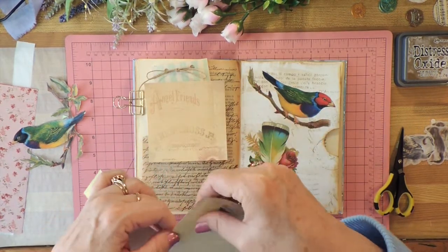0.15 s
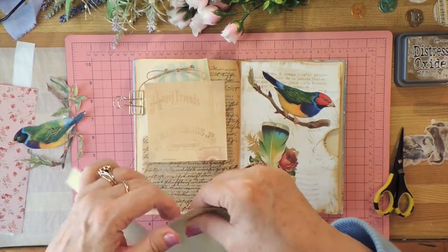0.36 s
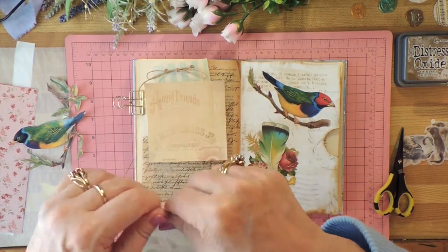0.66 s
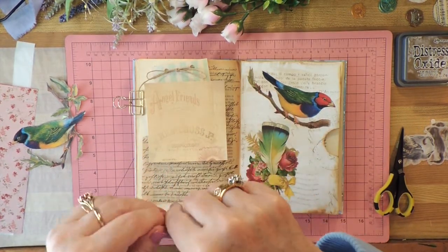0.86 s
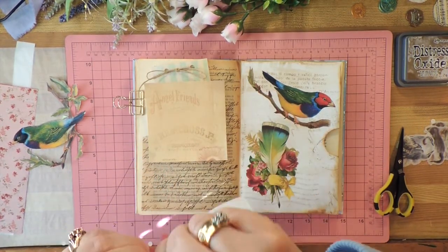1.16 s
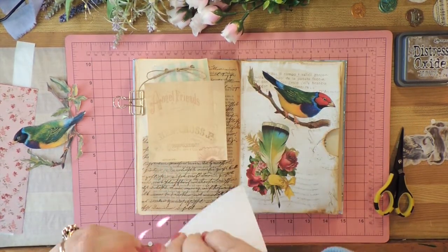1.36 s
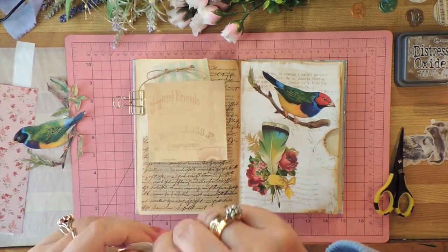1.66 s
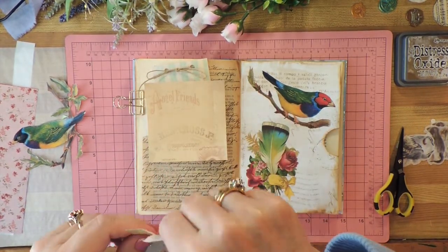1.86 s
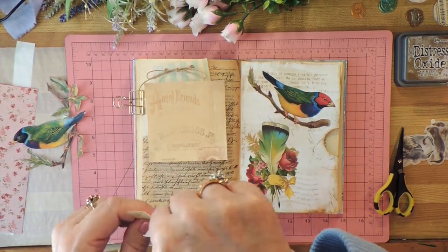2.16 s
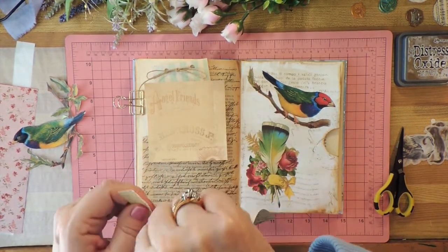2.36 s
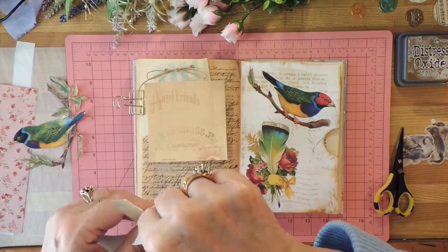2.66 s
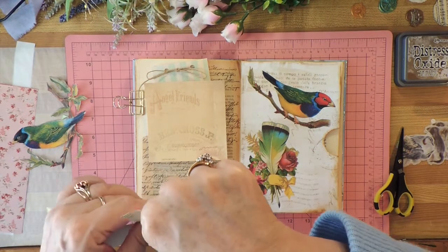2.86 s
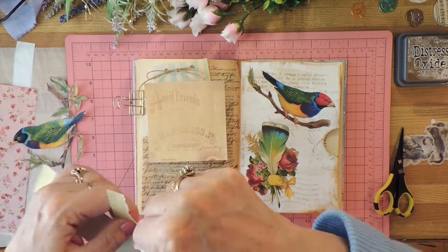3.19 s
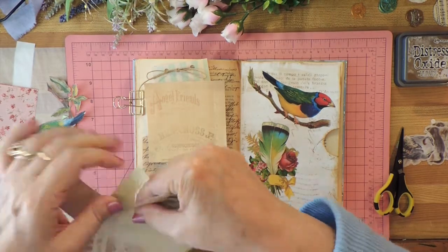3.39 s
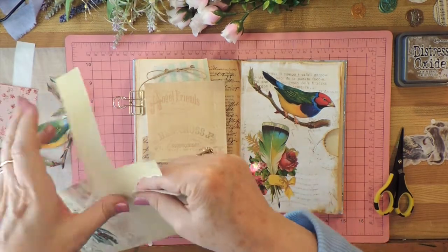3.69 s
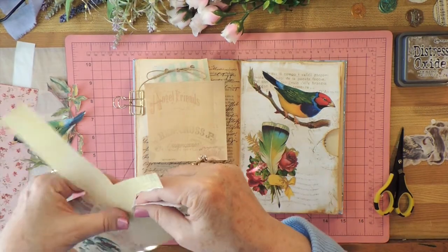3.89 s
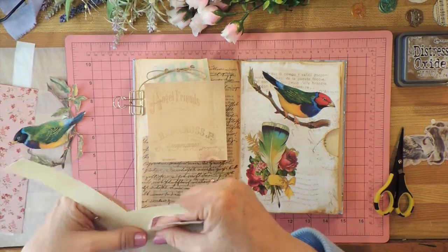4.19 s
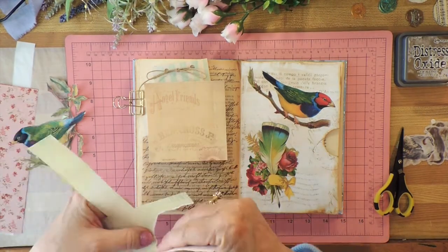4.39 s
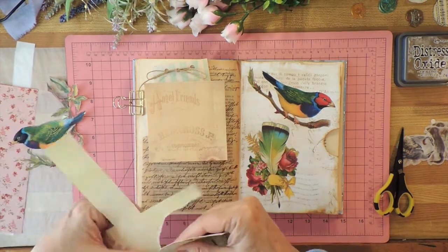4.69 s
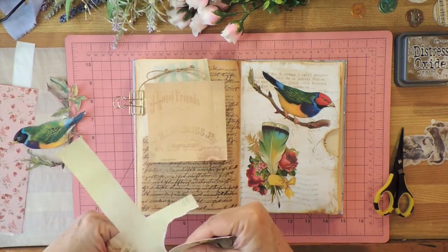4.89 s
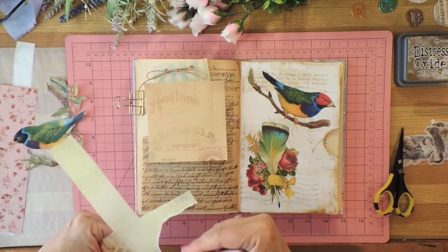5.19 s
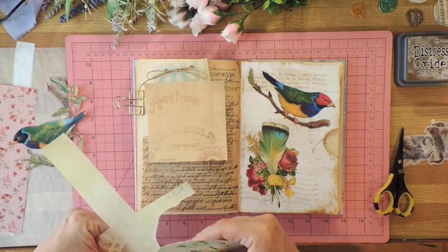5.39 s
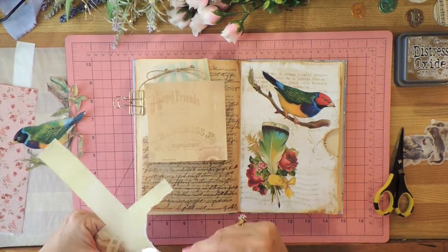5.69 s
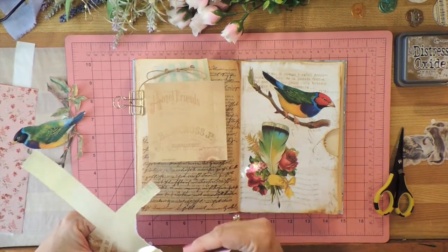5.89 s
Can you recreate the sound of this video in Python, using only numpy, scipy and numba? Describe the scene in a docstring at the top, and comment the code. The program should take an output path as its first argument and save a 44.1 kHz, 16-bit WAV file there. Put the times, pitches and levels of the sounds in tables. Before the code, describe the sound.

Dry, crisp paper handling close up, leaning slightly right. Faint skin-on-paper scuffs lead to a brief rip, then a stuttering cluster, a softer double tear, a hard snap of the sheet, and more sharp rips with pauses of rustling between. The last tear ends in a papery pop. Short indoor reverberation, very quiet air, and a barely audible soft clock tick once a second.

```python
"""Tearing a paper strip

A strip is torn from a sheet of paper in short rips, close to a stereo microphone in a small room.
Avalanches of fibre clicks crackle and excite the sheet; between rips, stick-slip clicks of sliding
fingers drive a held flap and damped bending modes sound as the paper buckles.
A clock ticks faintly once a second as a short sine pulse, over quiet coloured noise."""
import sys
import numpy as np
from scipy import signal
from scipy.fft import rfft, irfft
from scipy.io import wavfile
from numba import njit

SR = 44100
rng = np.random.default_rng(int(sys.argv[2]) if len(sys.argv) > 2 else 0)


def digitize_waveform(pressure):
    """Quantize a signal to 16-bit integers and store it at the path in sys.argv[1].

    Rows of a 2-D input are taken as channels; values are limited to [-1, 1].
    """
    field = np.atleast_2d(pressure).T
    bounded = np.clip(field, -1, 1)
    quanta = np.round(bounded * 32767).astype(np.int16)
    wavfile.write(sys.argv[1], SR, quanta)


N = 266760


def undb(db):
    """Logarithmic level: decibels to amplitude gain."""
    return 10 ** (np.asarray(db) / 20)


def unit(x):
    """Power normalisation: scale to rms 1."""
    return x / np.sqrt(np.mean(x ** 2))


def add(out, s, x):
    """Superposition: mix x into out from time s in seconds."""
    i = max(int(s * SR), 0)
    out[..., i:i + x.shape[-1]] += x[..., :max(N - i, 0)]


def spectrum(points, size):
    """Logarithmic frequency scale: read (Hz, dB) points at the bins of a transform."""
    hz, db = np.transpose(points)
    bins_hz = np.fft.rfftfreq(size, 1 / SR)
    return np.interp(np.log(bins_hz + 1), np.log(hz), db)


def colour(x, points):
    """Spectral shaping: weight x by the points, then scale to rms 1."""
    size = x.shape[-1]
    return unit(irfft(rfft(x) * undb(spectrum(points, size)), size))


def band(x, lo_hz, hi_hz, order=2):
    """Causal Butterworth band-pass filtering."""
    sos = signal.butter(order, [lo_hz, min(hi_hz, .45 * SR)], "band", fs=SR, output="sos")
    return signal.sosfilt(sos, x)


def ring(t60, channels=1, size=16384):
    """Dense modal decay: noise of energy 1 that falls 60 dB in t60 seconds."""
    h = rng.standard_normal((channels, size)) * np.exp(-np.log(1000) * np.arange(size) / SR / t60)
    return h / np.sqrt(np.sum(h ** 2, axis=1, keepdims=True))


def walk(rate):
    """Random modulation: interpolated noise of rms 1 with `rate` new values a second."""
    return unit(np.interp(np.arange(N) / SR * rate, np.arange(N), rng.standard_normal(N)))


def grains(rate, spread_db):
    """Shot noise: clicks at random moments, `rate` a second, with an exponential spread of level."""
    struck = rng.random(N) < rate / SR
    polarity = rng.choice([-1, 1], N)
    return struck * polarity * undb(spread_db * np.minimum(rng.exponential(size=N), 4))


def aim(clicks, scatter):
    """Directivity: every click reaches left and right with unequal strength."""
    return clicks * (1 + scatter * rng.standard_normal(N) * np.array([[1], [-1]]))


def stroke(s, length_s, attack_s, swell_db, release_db_per_s):
    """Amplitude envelope: samples and effort 0-1 of a hand movement with attack, arch and release."""
    i = np.arange(int(s * SR), min(int((s + length_s + .5) * SR), N))
    age = (i - i[0]) / SR
    attack = np.sin(np.pi / 2 * np.minimum(age / attack_s, 1)) ** 2
    arch = np.sin(np.pi * np.minimum(age / length_s, 1)) - 1
    release_db = release_db_per_s * np.maximum(age - length_s, 0)
    return i, attack * undb(swell_db * arch - release_db)


@njit
def resonance(x, hz, share):
    """Resonance with moving centre: its width is a share of hz; white noise keeps its power."""
    y, b, low = np.empty(len(x)), 0., 0.
    for i in range(len(x)):
        g = np.tan(np.pi * hz[i] / SR)
        v = (b + g * (x[i] - low)) / (1 + g * (g + share))
        b, low = 2 * v - b, low + 2 * g * v
        y[i] = v * np.sqrt(share * (1 + g * (g + share)) / g)
    return y


def sheet(x, t60, shared_db, apart_db, warp_db, size=4096):
    """Modal radiation: brief modes shift as the sheet bends; treble differs between left and right."""
    hz, _, frames = signal.stft(x, SR, nperseg=size)
    count = frames.shape[-1]
    shared, left, right = (rfft(ring(t60, channels=count, size=size)).T for _ in range(3))
    # the sides part gradually around 2200 Hz
    spread = undb(apart_db) * (hz ** 2 / (hz ** 2 + 2200 ** 2))[:, None]
    modes = 1 + undb(shared_db) * shared + spread * np.array([left, right])
    modes /= np.sqrt(1 + undb(shared_db) ** 2 + spread ** 2 / 2)
    # each new shape favours other broad bands, about five to an octave
    place = 5 * np.log2(1 + hz / 400)
    shapes = rng.standard_normal((count, 32))
    warp = np.transpose([np.interp(place, np.arange(32), row) for row in shapes])
    return signal.istft(frames * modes * undb(warp_db * warp), SR, nperseg=size)[1][:, :N]


# Spectral shape of the quiet air. Each row: frequency in Hz, density in dB per Hz.
AIR_SHAPE = [(15, -47), (25, -13), (142, 4.5), (363, 0.5), (673, -5), (927, -4.5), (1720, -15),
             (4260, -21.5), (6200, -27.5), (13800, -36), (15000, -40.5)]


def air(level_db=-81, side_db=-8):
    """Stationary noise: quiet room rumble and hiss, the same in the middle with a weaker side part."""
    mid, side = (colour(rng.standard_normal(N), AIR_SHAPE) for _ in range(2))
    return undb(level_db) * (mid + undb(side_db) * side * np.array([[1], [-1]]))


# Fingers sliding to a new grip. Each row: start in seconds, length in seconds, attack in seconds,
# level in dB, broad rub trim in dB, fine hiss trim in dB, flap resonance at full effort in Hz.
GRIP_SLIDES = [(0.039, 0.12, 0.025, -42.5, -19, -3, 5080), (0.171, 0.14, 0.094, -62, 0, 1, 5100),
               (0.321, 0.079, 0.071, -45.5, -22, -11.5, 5100), (0.428, 0.11, 0.03, -75.5, 9.5, 3, 5630),
               (0.554, 0.13, 0.06, -78, 9, 7.5, 6440), (0.697, 0.066, 0.065, -61.5, -2, 4, 7000),
               (0.766, 0.16, .02, -70, -4, -13, 1490), (0.974, 0.02, 0.0059, -65.5, -2, 0, 5940),
               (1.01, 0.062, 0.048, -76.5, 2, 18, 5000), (1.294, 0.068, 0.028, -47, 3.5, 1.5, 3670),
               (1.599, 0.062, .025, -47.5, 0.5, -7, 5870), (1.654, 0.16, 0.04, -60, 0, -4.5, 4380),
               (1.914, 0.065, 0.075, -53.5, 1.5, 5.5, 6000), (2.053, 0.16, 0.056, -68.5, -0.5, -6.5, 3520),
               (2.29, 0.083, 0.013, -58, 11.5, 8.5, 4430), (2.658, 0.071, 0.015, -46.5, 3, 0.5, 5800),
               (2.759, 0.062, 0.049, -65.5, 1, 3, 5400), (2.831, 0.096, 0.038, -61, 3.5, 11, 6860),
               (2.96, 0.14, 0.042, -69.5, 6, 10, 4870), (3.056, 0.024, 0.013, -46, -13, -8.5, 4640),
               (3.145, 0.041, 0.0071, -39, -12, -1.5, 3200), (3.421, 0.1, 0.054, -44.5, -8.5, -9, 3870),
               (3.545, 0.17, 0.016, -72.5, -23, -10, 2900), (3.724, 0.11, 0.057, -68.5, 0, -6, 3450),
               (3.835, 0.03, 0.024, -58, -1, 4, 3750), (3.927, 0.025, .02, -76, -4.5, 12.5, 4400),
               (3.975, 0.13, 0.14, -41.5, 3.5, 3.5, 4300), (4.133, .140, 0.045, -48, 3, 0.5, 4500),
               (4.364, 0.21, 0.019, -44.5, -3, 1, 4140), (4.627, 0.077, 0.042, -58.5, 1, -1, 3970),
               (4.707, 0.071, 0.038, -54, 4, 2.5, 5200), (4.836, 0.14, 0.083, -60, 10.5, 7, 5040),
               (5.02, 0.038, 0.012, -53.5, -4, 3.5, 4600), (5.328, 0.022, 0.012, -49.5, 1.5, 1, 5350),
               (5.413, 0.025, 0.014, -57, -15.5, -4, 5380), (5.577, 0.17, 0.026, -85.5, 5, 2, 5060),
               (5.74, 0.12, 0.016, -45.5, -5, 4, 4700)]
# Spectral shape of the broad rub. Each row: frequency in Hz, density in dB per Hz.
RUB_SHAPE = [(200, -14.5), (600, -13.5), (1300, -14.5), (1800, -7), (2200, -8), (3000, 0), (4000, -3),
             (5200, -1), (6500, -4), (8000, 1.5), (9500, -26.5)]
# Shape of the fine hiss, also of the finest tearing fibres. Each row: frequency in Hz, density in dB per Hz.
FINE_SHAPE = [(6500, -28.5), (8200, -2), (10500, -2), (13500, -2.5), (16000, -18)]
# every slide is strongest halfway and trails off; the flap tightens with the grip
SLIDE_SWELL_DB, SLIDE_RELEASE_DB_PER_S, FLAP_RISE_OCTAVES = 4.5, 320.5, 0.053


def slides(flap_width=0.33):
    """Stick-slip friction: small slips of skin on paper drive a flap, pitched higher the tighter the grip."""
    slips = grains(rate=17000, spread_db=0.0)
    slips = unit(slips * undb(0.71 * walk(rate=440) + 2.0 * walk(rate=62)))
    rub = colour(aim(slips, scatter=1.0), RUB_SHAPE)
    fine = colour(aim(slips, scatter=0.25), FINE_SHAPE)
    drive = band(slips, 1400, 12000)
    out = np.zeros((2, N))
    for s, length_s, attack_s, db, rub_db, fine_db, hz in GRIP_SLIDES:
        i, effort = stroke(s, length_s, attack_s, SLIDE_SWELL_DB, SLIDE_RELEASE_DB_PER_S)
        flap_hz = hz * 2 ** (FLAP_RISE_OCTAVES * (effort - 1))
        flap = resonance(drive[i], flap_hz, flap_width)
        friction = flap + undb(rub_db) * rub[:, i] + undb(fine_db) * fine[:, i]
        add(out, s, undb(db) * effort * friction)
    return sheet(out, t60=0.019, shared_db=-4.5, apart_db=-1.5, warp_db=4.5)


def clock(first_s=.28, hz=838, db=-57, rise_s=0.0051):
    """Critically damped envelope on a sine: a soft, hollow tick once a second."""
    out = np.zeros(N)
    t = np.arange(SR // 10) / SR
    tick = np.sin(2 * np.pi * hz * t) * t / rise_s * np.exp(1 - t / rise_s)
    for second in range(6):
        add(out, first_s + second, undb(db) * tick)
    return out


# The sheet buckling under the fingers. Each row: start in seconds, level in dB, pitch in Hz,
# crack trim in dB, time to full swing in seconds.
SHEET_BUCKLES = [(0.756, -47.5, 277, -16, 0.0098), (0.978, -55.5, 700, -7, 0.004),
                 (0.996, -49, 560, -30, 0.0062), (1.031, -41.5, 457, -30, 0.0069),
                 (2.341, -40.5, 600, -7, 0.0052), (2.672, -35.5, 278, 1, 0.0063),
                 (2.886, -37, 506, -12, 0.01), (2.95, -47.5, 422, -0.5, 0.013),
                 (3.071, -49, 473, -14, 0.0068), (3.335, -33, 326.5, -2, 0.018),
                 (3.383, -37.5, 330, -2, 0.011), (3.491, -43, 461, -18, 0.0044),
                 (3.571, -47, 436, 11, 0.0082), (3.601, -45.5, 840, 14.5, 0.0041),
                 (3.641, -46, 761, -19, 0.0073), (3.720, -55, 330, -20, 0.0042),
                 (4.095, -22, 500, 11, 0.0032), (4.233, -38.5, 700, -1.5, 0.0061),
                 (5.027, -25.5, 868, -17.5, 0.0084), (5.148, -29.5, 257, -5, 0.0096),
                 (5.340, -28.5, 499, -40, 0.0084), (5.362, -39, 726, -31, 0.0063),
                 (5.963, -24.5, 479, 0, 0.0028)]


def buckles(width=1.635, pop_db=-11, flutter_db=-11, crack_db=-15, tail_db=-13, tail_t60=0.18):
    """Snap-through buckling: one damped bending mode, a flutter of its neighbours and a dry crack."""
    out = np.zeros(N)
    t = np.arange(SR // 5) / SR
    for s, db, hz, crack_trim_db, rise_s in SHEET_BUCKLES:
        # a slack sheet swings slowly, a taut one with a tick; both settle in the same short tail
        swing = t / rise_s * np.exp(1 - t / rise_s)
        decay = np.exp(-np.log(1000) * t / tail_t60)
        tail = undb(tail_db) * decay * (1 - np.exp(-t / rise_s))
        noise = rng.standard_normal(len(t))
        pop = undb(pop_db) * np.sin(2 * np.pi * hz * t)
        flutter = undb(flutter_db) * unit(band(noise, hz / width, hz * width))
        crack = undb(crack_db + crack_trim_db) * unit(band(noise, 1600, 3000, order=3))
        add(out, s, undb(db) * (pop + flutter + crack) * (swing + tail))
    return band(out, 200, 8000, order=3)


# Pulls that run the tear on. Each row: start in seconds, length in seconds, fibre crackle level in dB,
# sheet body trim in dB, finest fibres relative to the crackle in dB, resonance of the free sheet in Hz.
TEAR_PULLS = [(1.435, .020, -42, -15, -2.5, 1350), (1.454, 0.077, -28, -1, 3, 1120),
              (2.337, 0.051, -30, -16, 0, 695), (2.388, 0.047, -34.5, -2.5, -4, 646),
              (2.448, 0.11, -31.5, 1.5, -1.5, 2010), (3.161, 0.11, -26, -9, -4.5, 2050),
              (3.299, 0.081, -25.5, -8, -2, 1600), (4.095, 0.029, -30, 5.5, -14, 850),
              (4.437, 0.11, -21.5, -11, -3.5, 1145), (4.544, 0.036, -34, -15, -0.5, 1360),
              (5.053, 0.041, -35, -3, -18.5, 1050), (5.132, 0.081, -25, -5.5, 3, 880),
              (5.208, 0.01, -38.5, -8, 1, 1280), (5.803, 0.019, -35.5, -10, -3, 1900),
              (5.823, 0.049, -29, -2, -3, 600), (5.873, 0.053, -31, -4, 4, 1110),
              (5.933, 0.041, -30, -6, 2.5, 560)]
# Spectral shape of the fibre crackle. Each row: frequency in Hz, density in dB per Hz.
FIBRE_SHAPE = [(900, -48), (1700, -26.5), (2100, -2.5), (2900, 5), (3900, 2), (5200, 2), (7000, 5),
               (8000, -2), (9500, -22.5)]
# Spectral shape of the shaken sheet. Each row: frequency in Hz, density in dB per Hz.
BODY_SHAPE = [(60, -55), (150, -36.5), (250, -5), (350, -11.5), (490, 6.5), (650, -3), (850, -2),
              (1250, -6.5), (1650, 6), (2000, 4), (2700, -21)]
# every pull bites quickly, is strongest halfway and dies away; the sheet's shaking builds up more slowly
RIP_ATTACK_S, RIP_SWELL_DB, RIP_RELEASE_DB_PER_S, SHAKE_LAG_S = 0.0045, 5, 382.5, 0.02


def rips(free_db=-6, free_width=1.0, body_trim_db=-3):
    """Avalanche fracture: fibres break in bursts that shake the sheet and ring its free part."""
    breaks = grains(rate=7000, spread_db=2.4)
    breaks = breaks * undb(2.6 * walk(rate=800) + 1.2 * walk(rate=200))
    fibre = colour(aim(breaks, scatter=.45), FIBRE_SHAPE)
    fine = colour(aim(breaks, scatter=.65), FINE_SHAPE)
    body = colour(breaks, BODY_SHAPE)
    drive = band(unit(breaks), 220, 2400)
    out = np.zeros((2, N))
    for s, length_s, db, body_db, fine_db, hz in TEAR_PULLS:
        i, effort = stroke(s, length_s, RIP_ATTACK_S, RIP_SWELL_DB, RIP_RELEASE_DB_PER_S)
        free_part = resonance(drive[i], np.full(len(i), float(hz)), free_width)
        shake = undb(body_trim_db) * body[i] + undb(free_db) * free_part
        build_up = 1 - np.exp(-(i - i[0]) / SR / SHAKE_LAG_S)
        tear = fibre[:, i] + undb(body_db) * build_up * shake + undb(fine_db) * fine[:, i]
        add(out, s, undb(db) * effort * tear)
    return sheet(out, t60=.014, shared_db=-6.5, apart_db=-5, warp_db=2)


# Tough fibre bundles giving way. Each row: start in seconds, nominal peak level in dB.
BUNDLE_SNAPS = [(1.502, -11), (2.3201, -19), (2.3659, -7.5), (2.3724, -12), (2.4199, -18), (2.4503, -18),
                (2.6738, -24), (2.7097, -26), (4.4019, -20), (4.4817, -7), (4.5161, -5), (4.5424, -9),
                (5.0834, -21), (5.1517, -6), (5.1801, -3), (5.7543, -27), (5.7773, -22), (5.8032, -18),
                (5.8541, -7), (5.8604, -5), (5.882, -11), (5.914, -10), (5.9429, -11)]


def snaps(rise_s=.0008, crest_db=8.5, side_share=.45):
    """Impulsive fracture: a bundle of fibres parts in one noise burst, two or three milliseconds long."""
    out = np.zeros((2, N))
    age = np.arange(SR // 100) / SR / rise_s
    for s, db in BUNDLE_SNAPS:
        mid, side = unit(band(rng.standard_normal((2, len(age))), 2800, 18000))
        burst = mid + side_share * side * np.array([[1], [-1]])
        # the crest allowance turns a peak level into an rms level
        add(out, s, undb(db - crest_db) * age * np.exp(1 - age) * burst)
    return out


def room(x, t60=0.17, wet_db=-16):
    """Reverberation: a small furnished room answers 5 ms late, its lower part alike on both sides."""
    h = band(ring(t60, channels=2), 900, 9000, order=1) + band(ring(t60), 270, 1400, order=1)
    out = x.copy()
    add(out, .005, undb(wet_db) * signal.fftconvolve(x, h, axes=1))
    return out


def scene():
    """Superposition of sources: paper and clock in the room, over its quiet air."""
    return room(rips() + snaps() + slides() + buckles() + clock()) + air()


# Level of left minus right at the microphone. Each row: frequency in Hz, difference in dB.
LEFT_MINUS_RIGHT = [(300, -3.4), (1400, -1.8), (5500, -3), (9500, -.7), (13000, -2)]


def record(dry, lag_s=.000013):
    """Interchannel level and time difference: left is softer and later; a steep low-pass cuts the top."""
    half_lean_db = spectrum(LEFT_MINUS_RIGHT, N) / 2
    late = np.exp(-2j * np.pi * np.fft.rfftfreq(N, 1 / SR) * lag_s)
    sides = np.array([undb(half_lean_db) * late, undb(-half_lean_db)])
    heard = irfft(rfft(dry) * sides, N)
    return signal.sosfilt(signal.ellip(10, .2, 80, 14200, fs=SR, output="sos"), heard)


dry = scene()
out = record(dry)
digitize_waveform(out)
```